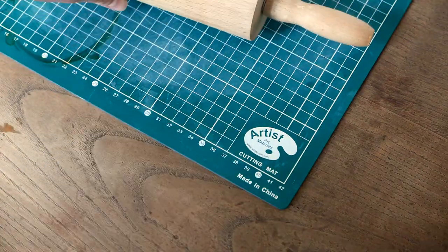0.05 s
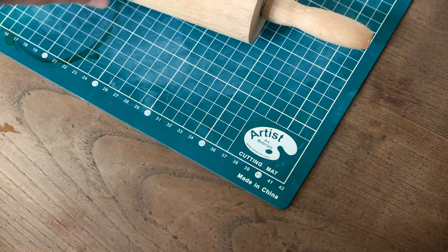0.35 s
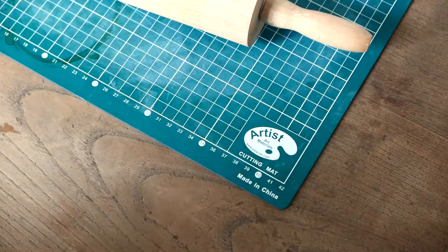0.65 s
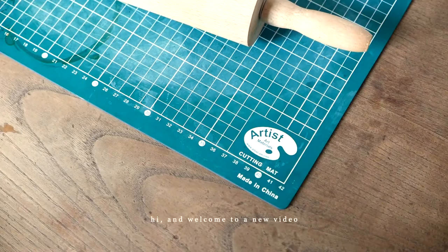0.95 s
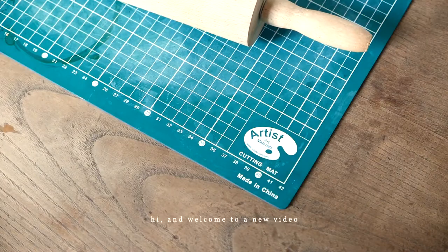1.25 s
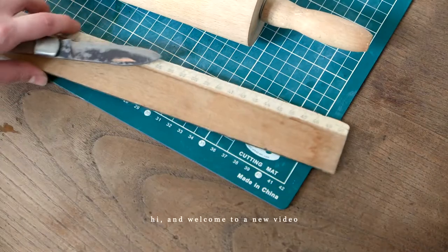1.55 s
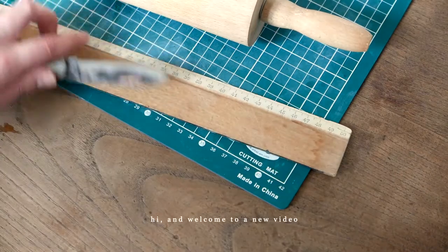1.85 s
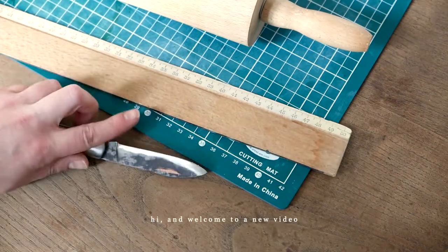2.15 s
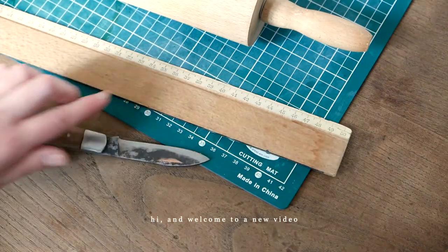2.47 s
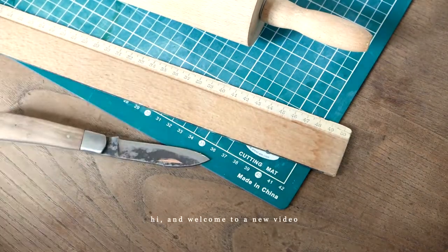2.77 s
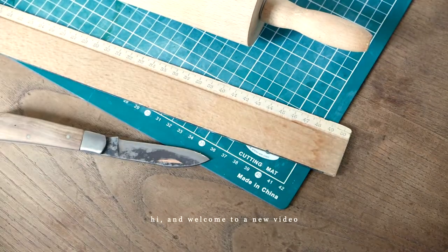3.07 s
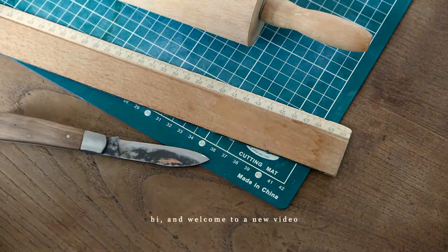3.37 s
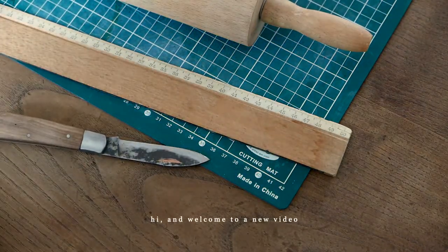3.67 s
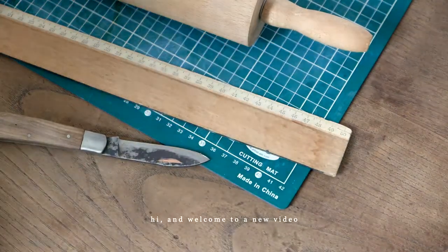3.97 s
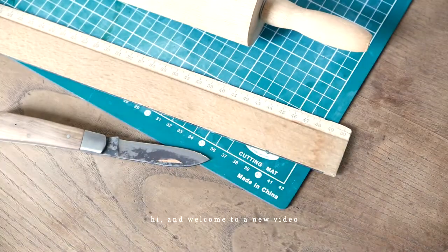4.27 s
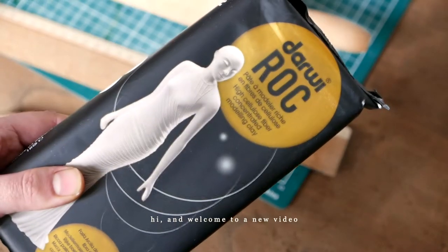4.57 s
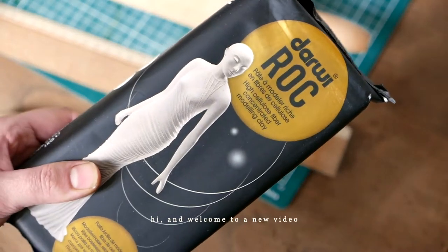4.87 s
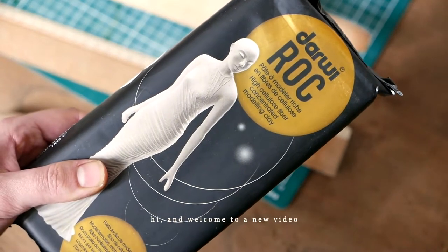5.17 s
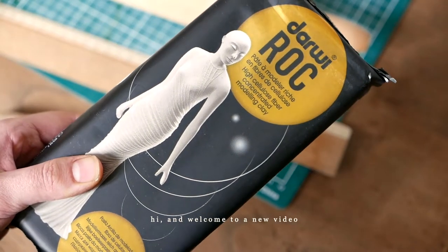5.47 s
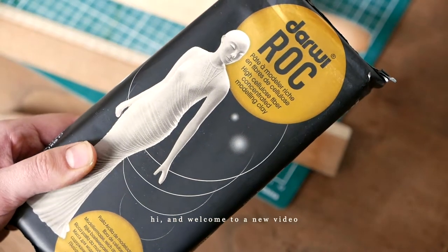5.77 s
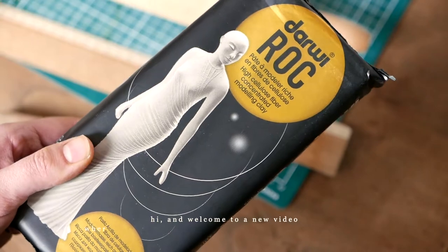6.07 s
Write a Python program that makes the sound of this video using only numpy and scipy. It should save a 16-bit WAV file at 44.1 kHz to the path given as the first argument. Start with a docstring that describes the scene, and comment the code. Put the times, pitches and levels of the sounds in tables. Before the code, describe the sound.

Close to the microphone in a small, slightly live room, tools are laid on a wooden table: first a hollow rolling pin thud, then a loud, bright ruler slap, then softer knife knocks. A crisp key clack comes after the thud and again near the end. Faint hand swishes and the small, uneven ticks of a focusing camera lens fill the quieter stretches, above steady low hiss.

```python
"""Tools set down on a table

A rolling pin, a wooden ruler and a knife land on a cutting mat on a wooden table in a small live room;
each blow rings the table top and the tool. A key clacks twice, close, dry and centred.
A camera lens ticks as it hunts for focus, over microphone hiss, room tone and faint hand noises."""
import sys
import numpy as np
from scipy import signal
from scipy.io import wavfile
from scipy.ndimage import uniform_filter1d

SR = 44100
rng = np.random.default_rng(int(sys.argv[2]) if len(sys.argv) > 2 else 0)


def unload_audio(sound):
    """Save the sound as a 16-bit wav file, at the path given as the first command line argument."""
    columns = np.transpose(np.atleast_2d(sound))
    # keep every value between -1 and 1, then stretch to whole-number steps
    steps = np.round(np.clip(columns, -1, 1) * 32767)
    wavfile.write(sys.argv[1], SR, steps.astype(np.int16))


N = 274302

# background spectra: f/Hz, level/dB
HISS_SPECTRUM = [(300, -5.5), (1500, -3), (2500, -4.5), (2820, 3), (3050, -4), (3330, 0.5), (3650, -6.5),
                 (3970, 1.5), (4400, -9), (6000, -7.5), (7000, -9), (7900, -13.5), (10000, -7),
                 (15500, -15)]
ROOM_TONE_SPECTRUM = [(25, -23), (70, -30.5), (125, -2.5), (200, 1.5), (390, 4), (470, -5), (570, 6.5),
                      (950, 2.5), (1300, -6), (2500, -20.5), (6000, -13.5), (15000, -42.5)]
DRONE_SPECTRUM = [(200, -20), (310, -4.5), (355, -0.5), (410, -4.5), (480, -28), (1500, -63)]
RUMBLE_SPECTRUM = [(50, -35), (130, -5), (210, 2.5), (350, 2.5), (480, -8.5), (2000, -59.5)]

# blows on the table: t/s, level/dB, low-pass f/Hz (hardness), high-pass f/Hz (lightness)
PIN_BLOWS = [(.0195, -34.5, 3040, 120), (.0308, -25.5, 6100, 149), (.0352, -22.5, 710, 60),
             (.0565, -23, 600, 60)]
RULER_BLOWS = [(1.6744, -15.5, 16000, 696), (1.6761, -20, 11000, 720), (1.691, -21, 5630, 130),
               (1.7055, -32.5, 9040, 200), (1.7265, -27, 6900, 150)]
KNIFE_BLOWS = [(2.1085, -39, 1180, 800), (2.135, -48, 1250, 1000), (2.2147, -27, 1150, 100),
               (2.232, -31, 1350, 100), (2.39, -45, 1500, 150)]
HAND_BLOWS = [(3.9595, -45.5, 880, 302), (4.0272, -42.5, 1215, 60), (4.076, -52, 1000, 150)]
# blow spectra: f/Hz, level/dB
PIN_SPECTRUM = [(40, -43), (80, -23), (140, -5.5), (250, -5), (350, -4), (460, -14), (620, -7), (900, -2.5),
                (1600, -6), (2500, -5.5), (3400, -9), (4300, -21), (9000, -23), (15000, -25)]
RULER_SPECTRUM = [(50, -60), (120, -17), (250, -6), (480, -4), (750, -5.5), (1500, -7), (2100, -10),
                  (3300, -4), (4600, -5.5), (5800, -1), (8000, -15.5), (10000, -6), (12500, -13),
                  (16000, -18)]
KNIFE_SPECTRUM = [(50, -54), (120, -19), (220, -3), (400, 0.5), (480, -11.5), (600, -1.5), (900, -2),
                  (1300, -10), (2000, -15), (4000, -21), (12000, -22)]
# modes of table top, pin barrel, ruler, knife handle: f/Hz, relative peak/dB, t60/s
TABLE_MODES = [(152.6, 9, 0.43), (239, 12, 0.46), (272, 6, 0.2), (317.5, 16.5, 0.32), (385, 11, 0.34),
               (568, 10.5, 0.093), (608, 13, 0.34), (676, 10, 0.47), (800, -9, 0.35), (875, -10, 0.27),
               (910, 12, 0.25), (1074, 6, 0.31), (1368, 16.5, .25)]
PIN_MODES = [(165, 3, 0.22), (218.4, 13, 0.19), (250, 18.5, 0.18), (633.6, 22, 0.24)]
RULER_MODES = [(2880, 7.8, 0.2), (3350, 20.5, 0.067), (3680, 26, 0.044), (4550, 12, 0.138), (5260, 5, 0.15),
               (5550, 16, 0.11), (5300, 17, 0.13), (6400, 15, 0.3), (6620, 7, 0.212), (6900, 13, .22)]
KNIFE_MODES = [(220, 9, 0.28), (241, 13, 0.69), (410, 15.5, 0.28), (810, 8.6, 0.18), (875, 6.4, 0.36)]
# room decay: f/Hz, t60/s
ROOM_T60 = [(100, 0.65), (300, 0.33), (1000, 0.36), (3000, 0.33), (6000, 0.29), (10000, 0.23),
            (16000, 0.16)]

# first touch of each key stroke: t/s
KEY_PRESSES = [.993, 5.8498]
# key contacts, bottoming out to release: t/s after touch, snap level/dB, rattle level/dB
KEY_CONTACTS = [(0.0214, -29.5, -52), (0.025, -25, -27.5), (0.1188, -41, -52), (.135, -44.5, -43.5),
                (.153, -48, -35.5), (.168, -50, -45.5)]
# the key's sharp snap and hollow rattle: f/Hz, level/dB
SNAP_SPECTRUM = [(60, -20.5), (400, -9.5), (1200, -18), (1900, -5.5), (2700, -5.5), (4200, -6),
                 (6000, -7.5), (9500, -10.5), (12000, -10.5), (15500, -16)]
RATTLE_SPECTRUM = [(60, 3), (300, -2), (600, -4.5), (1050, -2), (1500, -3.5), (2150, -3), (3300, -5),
                   (5000, -10), (8000, -15), (11000, -14), (15500, -25)]
# modes of the key cap and the desk below: f/Hz, level/dB, t60/s
CAP_MODES = [(2640, 3.5, 0.0075), (2640, -27, 0.023), (3370, -28, 0.14), (3600, 3, 0.0056),
             (3940, 6, 0.0046), (5000, -1.5, 0.0086), (7360, 3, 0.0021), (9000, 0, 0.0035),
             (11900, -4, .004)]
DESK_MODES = [(31.9, -13.5, 0.46), (113.8, -16, 0.32), (135.3, -4.5, 0.11)]

# hands and tools brushing the mat: t/s, relative level/dB, length/s, low-pass f/Hz
BRUSHES = [(1.31, -58, 0.14, 5000), (1.498, -52, 0.1, 9200), (1.607, -46.5, 0.2, 12200),
           (3.093, -63, 0.92, 11900), (3.944, -56, 0.31, 3000), (4.003, -56, 0.066, 4200),
           (4.4, -48, 0.019, 5000), (4.447, -68, 0.34, 5500)]
# spectrum of brushes and hand bumps: f/Hz, level/dB
HAND_SPECTRUM = [(60, -10), (250, -1), (700, 4.5), (1500, -5.5), (3200, 0), (6000, -6), (10000, -6),
                 (16000, -11.5)]

# clear focus steps: t/s, nominal tick level/dB, clunk level/dB
FOCUS_STEPS = [(1.3886, -56, -51), (1.586, -44, -42.5), (1.913, -51.5, -52), (2.3068, -40.5, -61),
               (2.4719, -52, -51.5), (2.6263, -39.5, -42.5), (2.8379, -54, -51), (3.0275, -44, -56),
               (3.7257, -51, -60), (3.7832, -53.5, -44.5), (4.3858, -37.5, -44.5), (4.4857, -54, -45),
               (4.6459, -53, -44.5), (4.8471, -41, -60), (4.9664, -39.5, -51), (5.012, -51.5, -56.5),
               (5.2064, -44.5, -42), (5.3303, -52, -52), (5.4063, -42, -44), (5.4787, -52, -57),
               (5.5651, -49.5, -48.5), (5.7263, -43, -44), (6.0866, -53.5, -44), (6.1666, -42, -56.5)]
# spells of faint focus nudges: start t/s, end t/s
FOCUS_HUNTS = [(4.447, 4.72), (5.526, 5.65)]
# camera shell spectrum: f/Hz, level/dB
SHELL_SPECTRUM = [(300, -32), (1500, -39), (2200, -4), (2800, 7.5), (3300, -13), (4300, 9), (5200, 0),
                  (7200, -15), (8500, -4), (12000, -21), (16000, -23)]
# modes of focus drive and lens group: f/Hz, level/dB, t60/s
DRIVE_MODES = [(2894, -7, 0.012), (3990, -1, 0.0089), (4404, 5.5, 0.0047), (5480, -5, 0.009),
               (6250, -6, 0.0072), (6920, -5.5, 0.0086), (11000, -6, 0.0022)]
LENS_MODES = [(412.6, 2.7, 0.12), (633, 13, 0.03), (718, 12, 0.034)]


def amp(db):
    """Decibels to gain."""
    return 10 ** (np.asarray(db) / 20)


def lookup(table, hz):
    """Interpolate over log frequency."""
    table_hz, values = np.transpose(table)
    return np.interp(np.log(hz + 1), np.log(table_hz), values)


def clock(length_s):
    """Sample times."""
    return np.arange(int(length_s * SR)) / SR


def decay(t, t60_s):
    """Fall of 60 dB per t60_s."""
    return np.exp(-np.log(1000) * t / np.maximum(t60_s, 1e-4))


def at_level(x, db):
    """Scale to the energy of 10 ms at this level."""
    energy = np.mean(np.sum(x ** 2, -1))
    return x * amp(db) / np.sqrt(energy / (.01 * SR))


def add(mix, start_s, sound):
    """Mix in place."""
    part = mix[:, max(round(start_s * SR), 0):][:, :sound.shape[-1]]
    part += sound[..., :part.shape[1]]


def butter(x, order, hz, kind):
    """Causal Butterworth filter."""
    return signal.lfilter(*signal.butter(order, hz, kind, fs=SR), x)


def coloured(x, spectrum, size=4096):
    """Minimum-phase filter; attacks stay sharp."""
    hz = abs(np.fft.fftfreq(size, 1 / SR))
    log_gain = np.log(amp(lookup(spectrum, hz)))
    response = np.exp(np.conj(signal.hilbert(log_gain)))
    taps = np.fft.ifft(response).real[:size // 2]
    return signal.fftconvolve(np.atleast_2d(x), taps[None], axes=1)[:, :x.shape[-1]]


def stereo(x, coherence):
    """Blend two independent signals into left and right."""
    side = np.sqrt((1 - coherence) / 2)
    mid = np.sqrt(1 - side ** 2)
    return np.array([mid * x[0] + side * x[1], mid * x[0] - side * x[1]])


def noise(spectrum, coherence):
    """Steady stereo noise, rms 1."""
    x = coloured(stereo(rng.standard_normal((2, N)), coherence), spectrum)
    return x / x.std()


def scatter(t):
    """Two trains of random taps, flat spectrum."""
    shape = (2, len(t))
    return rng.choice([-1., 1.], shape) * (rng.random(shape) < .25)


def ringing(modes, t):
    """Decaying sines of a struck part."""
    return sum(amp(db) * decay(t, t60_s) * np.sin(2 * np.pi * hz * t) for hz, db, t60_s in modes)


def swell(start_s, end_s, db, rise_s, fall_s):
    """Gain that rises, holds and falls."""
    t = np.arange(N) / SR
    return amp(db) * np.clip(np.minimum((t - start_s) / rise_s, (end_s - t) / fall_s), 0, 1)


def background(hiss_db=-60.5, tone_db=-63.5):
    """Microphone hiss, a brief low drone, and room tone that swells once with a soft rumble."""
    tone_gain = np.hypot(amp(tone_db), swell(1.57, 5, db=-59, rise_s=0.7, fall_s=0.55))
    tone = tone_gain * noise(ROOM_TONE_SPECTRUM, coherence=0.19)
    drone = swell(.5, 1.1, db=-60.5, rise_s=0.12, fall_s=0.2) * noise(DRONE_SPECTRUM, coherence=0.93)
    rumble = swell(.9, 4.5, db=-64.5, rise_s=0.8, fall_s=0.5) * noise(RUMBLE_SPECTRUM, coherence=1)
    hiss = amp(hiss_db) * noise(HISS_SPECTRUM, coherence=0.065)
    return hiss + tone + drone + rumble


def room(t, wet_db, build_s=0.0067):
    """Room response: builds up, then the treble dies first."""
    hz, frame_s, bands = signal.stft(scatter(t), SR, nperseg=256)
    coherence = lookup([(350, 1.0), (700, 0.77)], hz)  # mono bass, wider treble
    bands = stereo(bands, coherence[:, None]) * decay(frame_s, lookup(ROOM_T60, hz)[:, None])
    tail = signal.istft(bands, SR, nperseg=256)[1][:, :len(t)]
    tail *= 1 - np.exp(-t / build_s)
    return amp(wet_db) * tail / np.linalg.norm(tail[0])


def table_blows(blows, spectrum, modes, ring_db, clatter_db, clatter_t60_s, wet_db, left_db,
                coherence=0.99):
    """Crack, clatter, modes and room per blow; soft contacts lose treble, light ones bass."""
    out, t = np.zeros((2, N)), clock(.7)
    ring = np.zeros_like(t)
    for hz, db, t60_s in modes:
        gain = amp(db + ring_db) * 2 * np.log(1000) / (t60_s * SR)  # spectral peak to amplitude
        ring += gain * decay(t, t60_s) * np.cos(2 * np.pi * hz * t)
    pan = amp([[left_db / 2], [-left_db / 2]])
    for start_s, db, lowpass_hz, highpass_hz in blows:
        clatter = stereo(scatter(t), coherence) * decay(t, clatter_t60_s)
        crack = (t == 0) + amp(clatter_db) * clatter / np.linalg.norm(clatter[0])
        blow = coloured(pan * crack + ring + room(t, wet_db), spectrum)
        blow = butter(blow, 2, lowpass_hz, "low")
        blow = butter(blow, 2, highpass_hz, "high")
        add(out, start_s, at_level(blow, db))
    return out


def rolling_pin():
    """The pin thuds down; barrel and table ring."""
    return table_blows(PIN_BLOWS, PIN_SPECTRUM, TABLE_MODES + PIN_MODES,
                       ring_db=4, clatter_db=5.5, clatter_t60_s=0.11, wet_db=3, left_db=1)


def chatter(t, spectrum, rise_s, t60_s, db):
    """Dense burst of tiny contacts."""
    burst = scatter(t)[0] * decay(t, t60_s) * (1 - np.exp(-t / rise_s))
    return at_level(coloured(burst, spectrum), db)


def key(bottom_out_s=.0255, rattle_rise_s=0.0025):
    """The key scrapes down; contacts snap, rattle the case and thump the desk; the cap rings."""
    stroke, t = np.zeros((1, SR // 2)), clock(.3)
    thump = -ringing(DESK_MODES, t)
    scrape = sum(chatter(t, spectrum, rise_s=0.011, t60_s=0.061, db=0)
                 for spectrum in (SNAP_SPECTRUM, RATTLE_SPECTRUM))
    add(stroke, 0, at_level(scrape, -38) + at_level(thump, -41))
    for start_s, snap_db, rattle_db in KEY_CONTACTS:
        snap = chatter(t, SNAP_SPECTRUM, rise_s=0.00032, t60_s=0.03, db=snap_db)
        rattle = chatter(t, RATTLE_SPECTRUM, rattle_rise_s, t60_s=0.068, db=rattle_db)
        case = chatter(t, RATTLE_SPECTRUM, rattle_rise_s, t60_s=0.26, db=rattle_db - 5)
        add(stroke, start_s, snap + rattle + case)
        add(stroke, start_s + rattle_rise_s, at_level(thump, rattle_db - 1))
    cap = ringing(CAP_MODES, t) * (1 - np.exp(-t / 0.00042))
    cap = butter(cap, 3, 2000, "high")  # the cap's ring stays above 2 kHz
    add(stroke, bottom_out_s, at_level(cap, -20))
    out = np.zeros((2, N))
    for start_s in KEY_PRESSES:
        add(out, start_s, stroke)
    return out


def brushing(grain_db=3):
    """Grainy swishes of skin and wood on the mat."""
    out = np.zeros((2, N))
    grain = uniform_filter1d(rng.standard_normal(N), size=130)
    rub = amp(grain_db * grain / grain.std()) * noise(HAND_SPECTRUM, coherence=0.66)
    for start_s, db, length_s, lowpass_hz in BRUSHES:
        t = clock(length_s)
        swish = butter(rub[:, round(start_s * SR):][:, :len(t)], 1, lowpass_hz, "low")
        add(out, start_s, amp(db) * np.sin(np.pi * t / length_s) ** .5 * swish)
    return out


def focus_nudges(gap_s=0.093, jitter_s=.005, tick_db=-55, clunk_db=-52, spread_db=1):
    """Faint, loosely paced steps during each hunt; rows as in FOCUS_STEPS."""
    return [rng.normal((step_s, tick_db, clunk_db), (jitter_s, spread_db, spread_db))
            for start_s, end_s in FOCUS_HUNTS for step_s in np.arange(start_s, end_s, gap_s)]


def lens(bounce_db=-12, lag_s=0.0028, firm_db=-44, softening=0.58):
    """The drive ticks, shakes the shell and bounces; the lens group stops with a clunk."""
    out, t = np.zeros((2, N)), clock(.08)
    tick_pan, clunk_pan = amp([[0], [-4]]), amp([[0], [-11]])  # louder at the left port
    clunk = butter(ringing(LENS_MODES, t), 3, 300, "high")
    for start_s, tick_db, clunk_db in FOCUS_STEPS + focus_nudges():
        modes = [(hz, db + 2 * rng.standard_normal(), t60_s) for hz, db, t60_s in DRIVE_MODES]
        tick = ringing(modes, t) * (1 - np.exp(-t / 0.00023))
        tick = at_level(tick, softening * min(tick_db - firm_db, 0))  # gentle steps hardly tick
        shell = at_level(coloured(scatter(t) * decay(t, t60_s=0.062), SHELL_SPECTRUM), -10)
        gain = amp(tick_db) * tick_pan
        add(out, start_s, gain * (tick + shell))
        add(out, start_s + lag_s, gain * amp(bounce_db) * tick)
        add(out, start_s + lag_s, clunk_pan * at_level(clunk, clunk_db))
    return out


def ruler():
    """The ruler slaps down and rings high over the table's modes."""
    return table_blows(RULER_BLOWS, RULER_SPECTRUM, TABLE_MODES + RULER_MODES, coherence=0.96,
                       ring_db=0, clatter_db=12, clatter_t60_s=0.021, wet_db=10, left_db=2)


def knife():
    """The knife settles in dull knocks; handle and table ring."""
    return table_blows(KNIFE_BLOWS, KNIFE_SPECTRUM, TABLE_MODES + KNIFE_MODES,
                       ring_db=7, clatter_db=12.5, clatter_t60_s=0.13, wet_db=11, left_db=-0.5)


def hand_bumps():
    """A hand softly bumps the table."""
    return table_blows(HAND_BLOWS, HAND_SPECTRUM, TABLE_MODES,
                       ring_db=7, clatter_db=8.5, clatter_t60_s=0.036, wet_db=9.5, left_db=8)


def scene():
    """Stereo sum of all sources."""
    table = rolling_pin() + ruler() + knife() + hand_bumps()
    return table + key() + lens() + brushing() + background()


def record(dry, cutoff_hz=16200):
    """Steep band limit."""
    taps = signal.firwin(511, cutoff_hz, window=("kaiser", 9), fs=SR)
    return signal.oaconvolve(dry, taps[None], "same", axes=1)


dry = scene()
out = record(dry)
unload_audio(out)
```